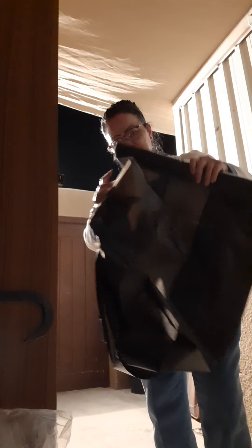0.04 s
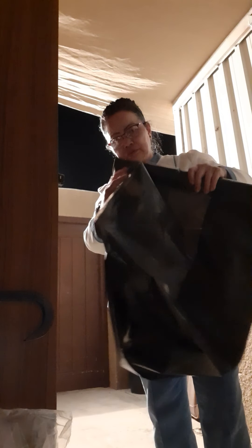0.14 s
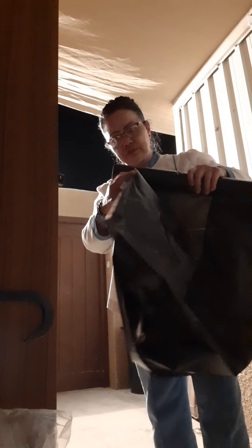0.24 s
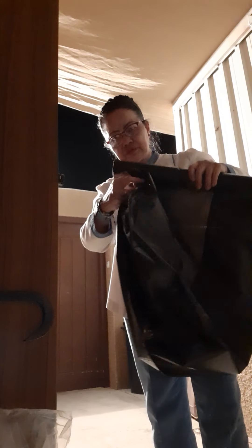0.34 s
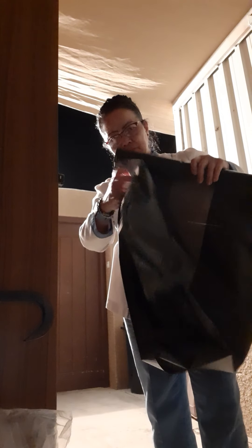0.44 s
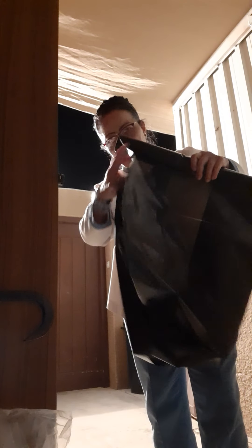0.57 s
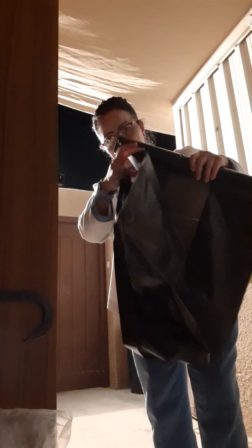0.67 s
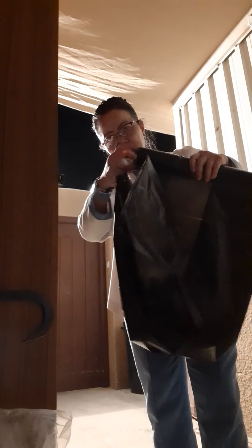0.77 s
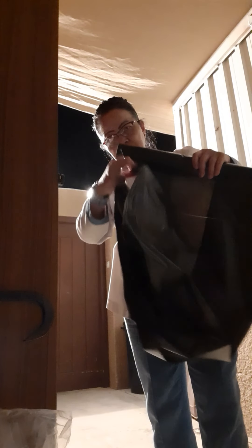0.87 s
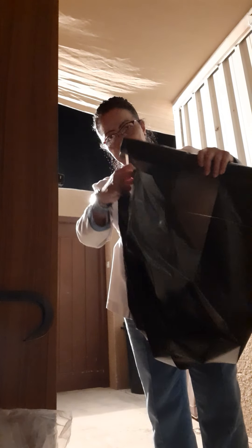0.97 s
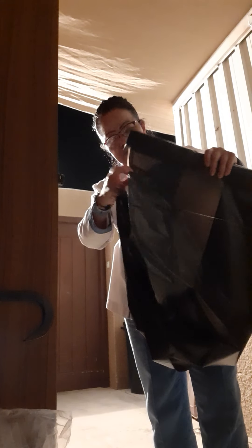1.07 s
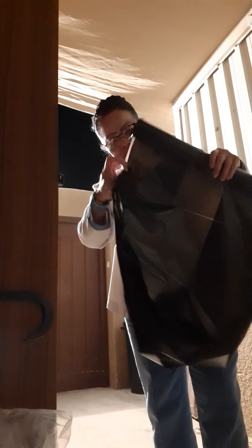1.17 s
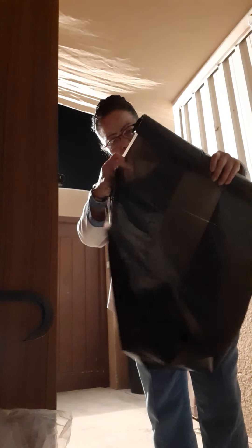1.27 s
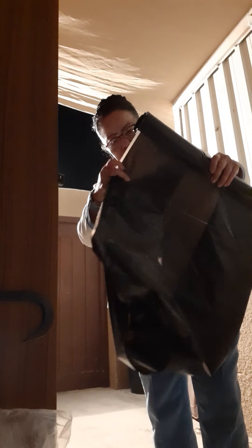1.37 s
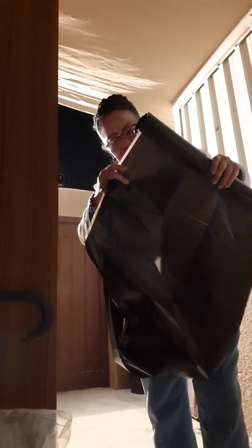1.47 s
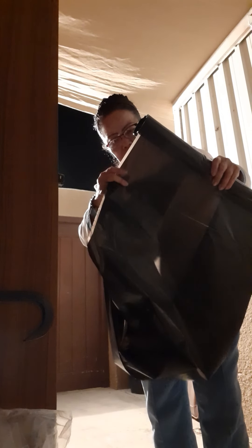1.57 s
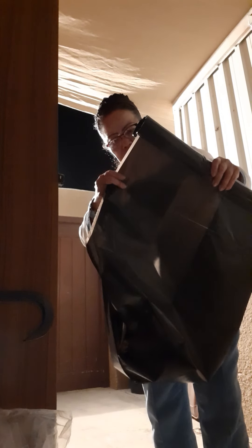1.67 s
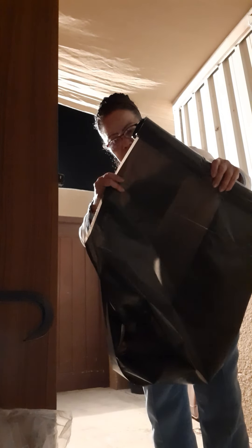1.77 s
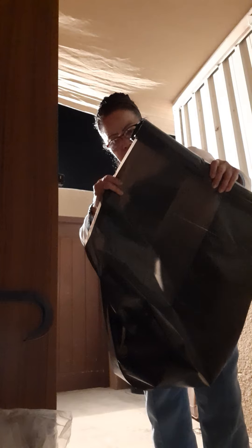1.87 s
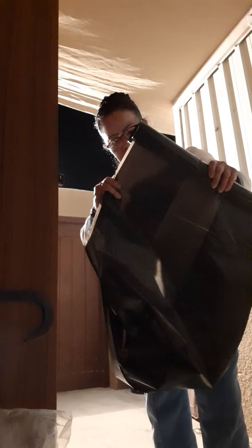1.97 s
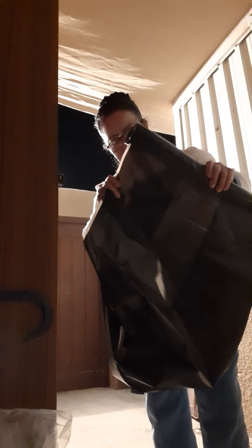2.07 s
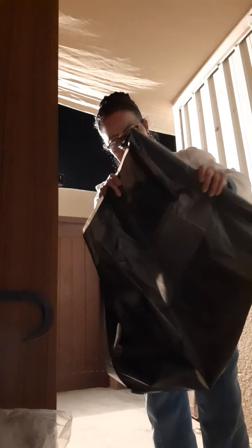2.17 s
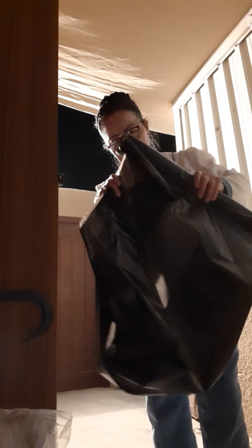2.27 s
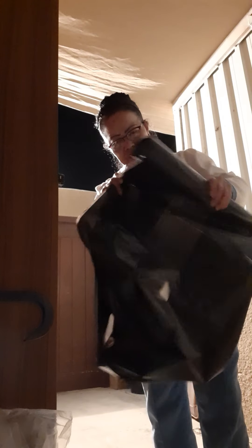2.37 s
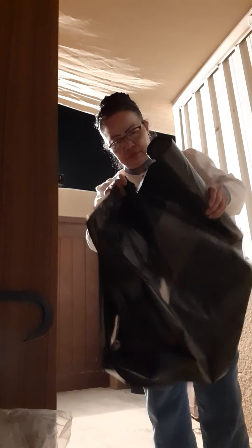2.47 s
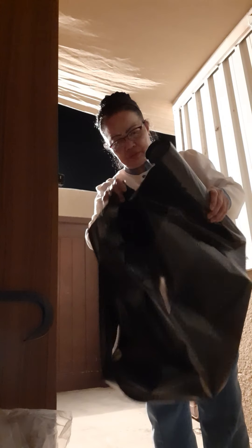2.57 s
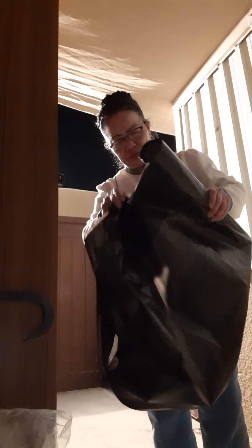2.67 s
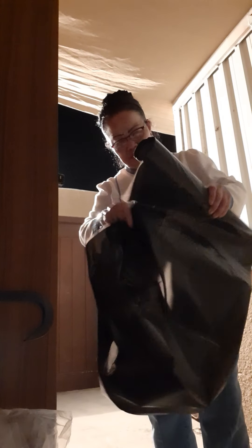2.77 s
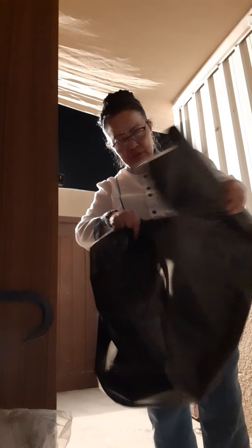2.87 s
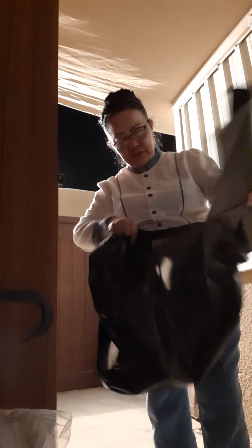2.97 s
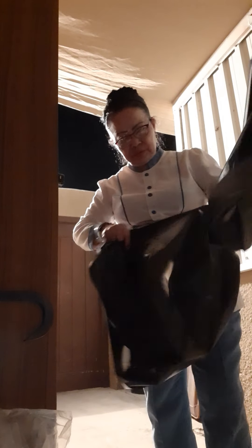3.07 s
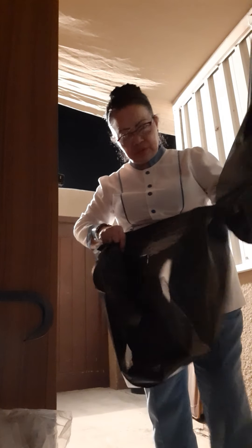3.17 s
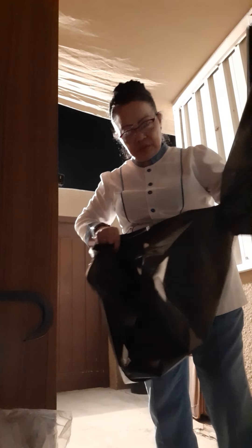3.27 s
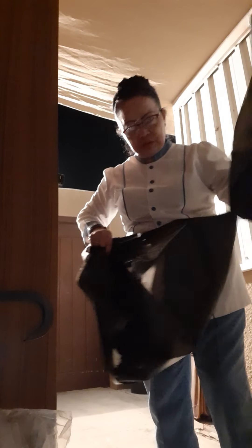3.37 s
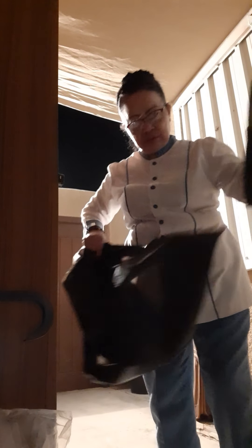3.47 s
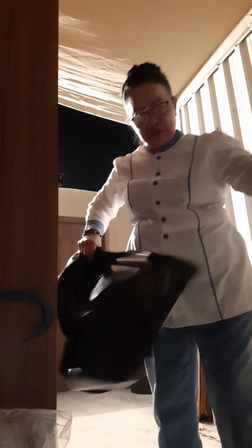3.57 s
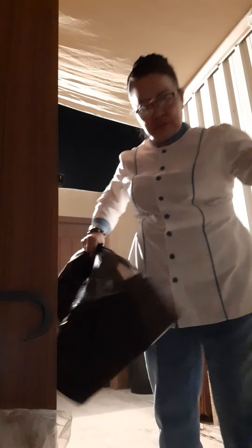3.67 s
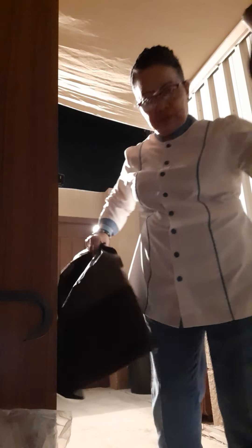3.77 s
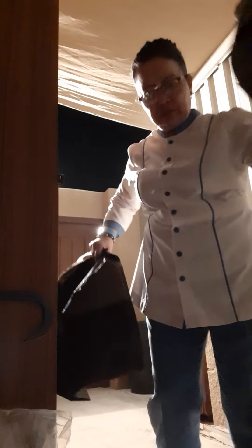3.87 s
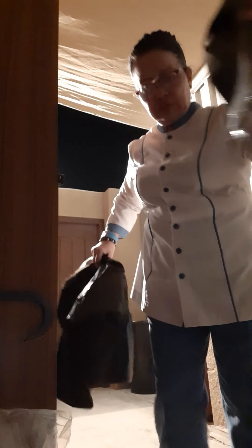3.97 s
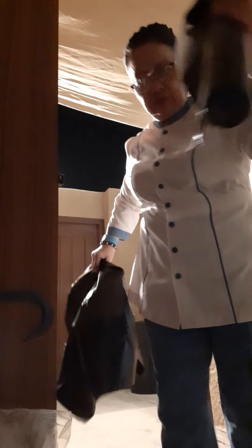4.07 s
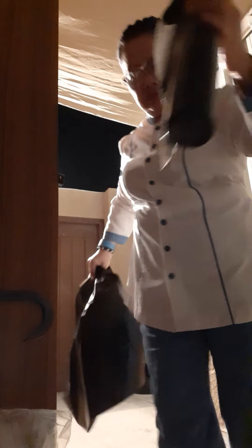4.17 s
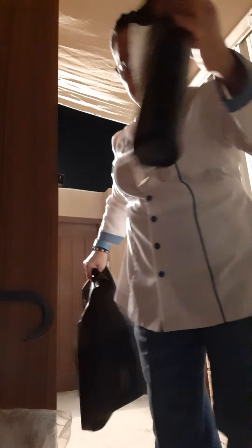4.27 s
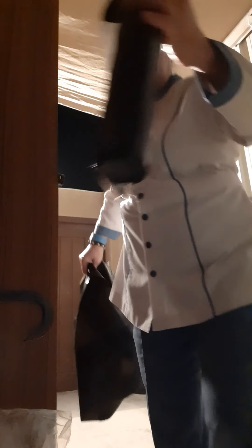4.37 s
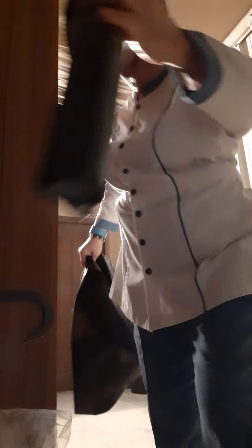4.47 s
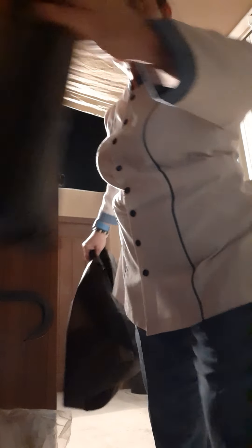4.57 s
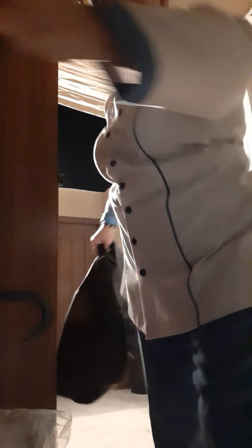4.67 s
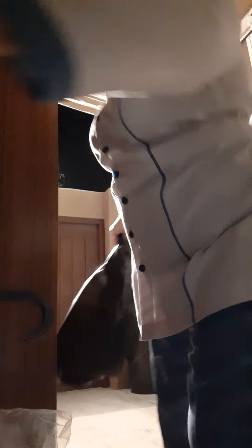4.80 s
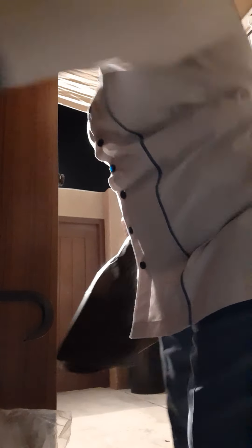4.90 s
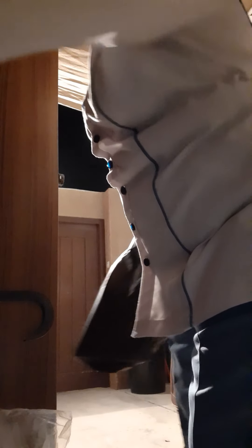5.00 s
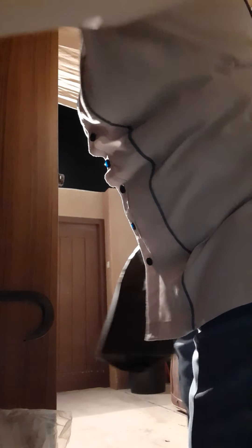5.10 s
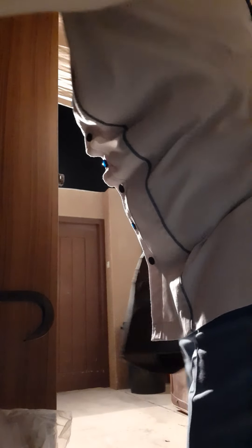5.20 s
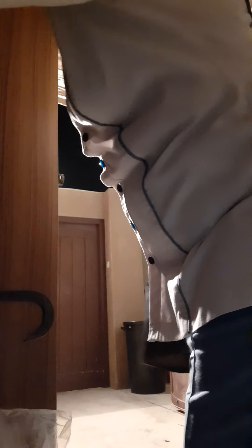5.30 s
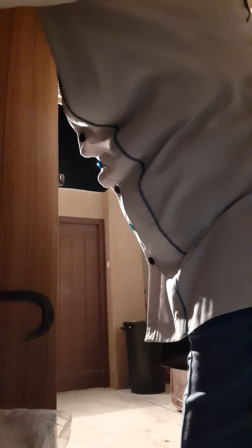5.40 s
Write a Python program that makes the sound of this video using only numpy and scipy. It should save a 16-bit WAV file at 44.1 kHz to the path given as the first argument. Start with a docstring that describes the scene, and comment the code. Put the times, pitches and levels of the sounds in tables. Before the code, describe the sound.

Thin plastic film rustles quietly over low room rumble, bursts into loud crackling tugs and a short rip, then fades to brushing and soft footfalls.

```python
"""Soft crinkling of a big plastic bin bag over a low room rumble, in a small hard-walled room.
The film, built from thousands of tiny creases, billows under hard tugs and rips along its perforation.
After one more tug the roll, then the sleeve, brush past close on the right as fine stick-slip grains.
Large creases snap as single ticks; two soft footfalls are short ringing knocks. Echoes join them all."""
import sys
import numpy as np
from scipy import signal
from scipy.fft import rfft, irfft
from scipy.io import wavfile
from scipy.ndimage import uniform_filter1d

SR = 44100
rng = np.random.default_rng(int(sys.argv[2]) if len(sys.argv) > 2 else 0)


def store_wav(level_fs):
    """Save 16-bit WAV to argv[1]."""
    pcm = np.round(np.clip(np.atleast_2d(level_fs), -1, 1) * 32767)
    wavfile.write(sys.argv[1], SR, pcm.T.astype(np.int16))


N = 239977
TIME = np.arange(N) / SR


def from_db(db):
    """Decibels to gain."""
    return 10 ** (np.asarray(db) / 20)


def rms_one(x):
    """Scale to rms 1."""
    return x / np.sqrt(np.mean(x ** 2) + 1e-20)


def at_hz(points, hz):
    """Read a spectrum on a log-frequency axis."""
    f, value = np.transpose(points)
    return np.interp(np.log(hz + 1), np.log(f), value)


def band(x, low_hz, high_hz, order=2):
    """Butterworth band-pass: keep what lies between two frequencies."""
    edges_hz = [low_hz, min(high_hz, .48 * SR)]
    return signal.sosfilt(signal.butter(order, edges_hz, "band", fs=SR, output="sos"), x + 1e-18)


def convolve(x, response):
    """Pass through an impulse response, channel by channel."""
    return signal.oaconvolve(np.atleast_2d(x), np.atleast_2d(response), axes=1)[:, :N]


def colour(x, spectrum, size=8192):
    """Causal (minimum-phase) filter with the given spectrum."""
    spectrum_db = at_hz(spectrum, np.fft.rfftfreq(size, 1 / SR))
    cepstrum = irfft(np.log(from_db(spectrum_db)))
    # folding the cepstrum forward in time makes the filter causal
    cepstrum[1:size // 2] *= 2
    cepstrum[size // 2 + 1:] = 0
    return convolve(x, irfft(np.exp(rfft(cepstrum))))


def resonate(x, hz, width_hz):
    """Two-pole resonance, gain 1 on top."""
    return signal.lfilter(*signal.iirpeak(hz, hz / width_hz, fs=SR), x + 1e-18)


def evened(x, window_s):
    """Hold the running level at 1; single grains keep standing out."""
    window = int(window_s * SR)
    power = uniform_filter1d(np.mean(x ** 2, axis=0), window)
    return x / np.sqrt(np.abs(uniform_filter1d(power, window)) + 1e-20)


def stroke(s, attack_s, hold_s, release_s, level_db, *above_db):
    """Power of one movement: it swells up to time s, holds and dies away; further rows are its layers."""
    before = np.maximum(s - TIME, 0) / attack_s
    after = np.maximum(TIME - s - hold_s, 0) / release_s
    gains = from_db(level_db + np.array([0, *above_db]))
    return (gains[:, None] * np.exp(-np.minimum(before + after, 20))) ** 2


def levels(strokes):
    """Overlapping movements add up: the level in dB, then each further layer in dB above it."""
    level_db, *others = 10 * np.log10(sum(strokes))
    return [level_db] + [db - level_db for db in others]


# Noise of the room. Each row: frequency in Hz, relative level in dB.
RUMBLE_SPECTRUM = [(15, -6), (25, -29.5), (46, 1), (70, -4.5), (100, -6), (125, -12.5), (190, -16),
                   (236, -18), (384, -21), (677, -27.5), (988, -25.5), (1330, -31.5), (1520, -26.5),
                   (1890, -40.5), (2480, -42.5), (2690, -43.5), (16000, -54)]
# How alike left and right are in the rumble. Each row: frequency in Hz, likeness from 0 to 1.
RUMBLE_LIKENESS = [(40, 0.99), (150, 0.91), (500, 0.71), (1200, 0.15), (4000, 0)]
RUMBLE_DB = -46   # rms, ahead of the microphone


def rumble():
    """Steady low room noise: a shared and an opposite part make it alike on both sides in the bass."""
    shared_db = [(hz, 10 * np.log10(1 + np.clip(c, 0, .995))) for hz, c in RUMBLE_LIKENESS]
    opposite_db = [(hz, 10 * np.log10(1 - np.clip(c, 0, .995))) for hz, c in RUMBLE_LIKENESS]
    mid, side = rng.standard_normal((2, N))
    stereo = colour(mid, shared_db) + colour(side, opposite_db) * [[1], [-1]]
    return from_db(RUMBLE_DB) * rms_one(band(colour(stereo, RUMBLE_SPECTRUM), 33.56, 22000, order=6))


# Narrow resonances of the room. Each row: frequency in Hz, width in Hz, level in dB (2 dB is taken off below).
ROOM_RESONANCES = [(222.4, 19, -8), (422.9, 15.2, -9), (571.8, 14, -6), (701.8, 16.5, -7.5),
                   (1029, 14, -6.5), (1528, 90, -3.5), (1734, 35, -4.5), (2051, 60.8, -0.5)]


def room_resonances(x):
    """Add the pitches at which the room itself rings along."""
    ringing = sum(from_db(db) * resonate(x, hz, width) for hz, width, db in ROOM_RESONANCES)
    return x + from_db(-2.0) * ringing


def room(x, wet_db, t60_low, t60_high):
    """Diffuse tail off the walls, dying sooner in the treble; t60 is the seconds taken to fade 60 dB."""
    t = TIME[:SR // 2]
    edges = np.geomspace(120, 17000, 8)
    t60s = np.geomspace(t60_low, t60_high, len(edges) - 1)
    tail = np.zeros((2, len(t)))
    for low_hz, high_hz, t60 in zip(edges, edges[1:], t60s):
        tail += band(rng.standard_normal((2, len(t))), low_hz, high_hz) * from_db(-60 * t / t60)
    tail = tail * (t > .006)   # the echoes start after 6 ms
    return x + from_db(wet_db) * convolve(x, tail / np.linalg.norm(tail[0]))


def narrow_lows(x, corner_hz):
    """Long waves reach both microphones alike, so the left-right difference loses its bass."""
    mid, side = (x[0] + x[1]) / 2, (x[0] - x[1]) / 2
    side = signal.sosfilt(signal.butter(1, corner_hz, "high", fs=SR, output="sos"), side)
    return np.array([mid + side, mid - side])


# The footfalls. Each row: start in seconds, level in dB, contact time in seconds (longer lands softer).
FOOTFALLS = [(4.681, -26.5, 0.0012), (5.3978, -29.5, 0.000294)]
# What a footfall rings with. Each row: frequency in Hz, level in dB, time to fade 60 dB in seconds.
FLOOR_RINGS = [(131.5, -8, 0.069), (249, -7, 0.0298), (369, 1.5, 0.0117), (595, -3, 0.0112),
               (926, -11.5, 0.0085), (1520, -10.5, 0.007)]


def footfalls():
    """A heel lands with a short dull knock: a few low tones that die away fast."""
    out = np.zeros(N)
    for s, level_db, contact_s in FOOTFALLS:
        t = np.maximum(TIME - s, 0)
        knock = sum(from_db(db - 60 * t / t60) * np.sin(2 * np.pi * hz * t) for hz, db, t60 in FLOOR_RINGS)
        out += from_db(level_db) * knock * (1 - np.exp(-t / contact_s))
    return out


def air_push(low_hz, high_hz):
    """Dull puffs of air shoved about by a moving surface; rms 1."""
    return rms_one(band(rng.standard_normal(N), low_hz, high_hz))


def crease(hz, lag, scatter_db, scatter_s, size=1200):
    """One crease in stereo: a sharp tick, a brief ring at `hz`, scatter off the sheet and nearby surfaces."""
    t = np.arange(size) / SR
    fade = np.exp(-t / scatter_s) * (1 - np.exp(-t / 0.000622))
    scatter = rng.standard_normal((2, size)) * fade
    paths = from_db(scatter_db) * scatter / np.linalg.norm(scatter[0])
    # the direct sound reaches one microphone first: a positive lag delays the left, in samples
    paths[[0, 1], [max(round(lag), 0), max(-round(lag), 0)]] += 1
    return paths + 1.244 * np.sqrt(4000 / hz) * resonate(paths, hz, 0.339 * hz)


def crackle(per_s, spread_db, lag, lag_spread, scatter_db, count=96):
    """Creases buckle at random, many small and a few large, each with a pitch and a place on the sheet."""
    kinds = []
    for hz in np.geomspace(900, 15000, count):
        kinds.append(crease(hz, lag + lag_spread * rng.normal(), scatter_db, 0.00642))
    sizes = from_db(spread_db * np.minimum(rng.exponential(1, N), 5)) * rng.choice([-1, 1], N)
    kind, length = rng.integers(0, count, N), kinds[0].shape[1]
    out = np.zeros((2, N + length))
    for at in np.flatnonzero(rng.random(N) < per_s / SR):
        out[:, at:at + length] += sizes[at] * kinds[kind[at]]
    return out[:, :N]


def sliding(strokes, spectrum, per_s, spread_db, lag, scatter_db, right_db, air_db):
    """Fine stick-slip grains close by on the right: the left hears them about `lag` samples late."""
    rub_db, sizzle_db = levels(strokes)
    moving = rub_db > -100
    grains = crackle(per_s * moving, spread_db, lag, lag_spread=0.77, scatter_db=scatter_db)
    grains = colour(grains, spectrum)
    rub = evened(band(grains, 276, 6000, order=4), 0.084)
    sizzle = evened(band(grains, 7870, 18700, order=4), 0.088) * from_db(sizzle_db + 2.5)
    air = from_db(air_db) * air_push(65, 203)
    return from_db(rub_db - 1.09) * (rub + sizzle + air) * from_db([[-right_db], [right_db]])


# The sleeve slides by. Each row: when it reaches full level in seconds, hold in seconds,
# rub in dB, sizzle in dB above the rub (`sliding` trims both a little).
SLEEVE_SLIDES = [(4.609, 0.029, -54, -1.5), (4.696, 0.0173, -55.5, 1), (4.769, .06, -55, -6.5),
                 (4.889, 0.0666, -54.5, -2), (5.093, 0.1372, -35.5, -5.5), (5.288, 0.048, -44.5, -2)]
# Tone of the rubbing sleeve. Each row: frequency in Hz, relative level in dB.
SLEEVE_SPECTRUM = [(120, -34), (200, -6), (263, -0.5), (366, -8), (635, -7), (1000, -12), (1420, -11.5),
                   (1680, -8), (1840, -15), (2050, -10), (4200, -3), (6520, -7), (7970, -7.5), (8900, -14),
                   (12800, -16), (16000, -19.5)]
# a longer slide starts and stops more gently: shares of its hold
SLEEVE_ATTACK_SHARE, SLEEVE_RELEASE_SHARE = 0.268, 0.522


def sleeve():
    """Cloth catches and slips in fine grains as it slides past the microphone."""
    slides = []
    for s, hold_s, rub_db, sizzle_db in SLEEVE_SLIDES:
        attack_s, release_s = SLEEVE_ATTACK_SHARE * hold_s, SLEEVE_RELEASE_SHARE * hold_s
        slides.append(stroke(s, attack_s, hold_s, release_s, rub_db, sizzle_db))
    return sliding(slides, SLEEVE_SPECTRUM, per_s=12000, spread_db=5.0, lag=17, scatter_db=3,
                   right_db=1.0, air_db=-16.0)


# The roll swings past the microphone. Each row: when it reaches full level in seconds, hold in seconds,
# rub in dB, sizzle in dB above the rub (`sliding` trims both a little).
ROLL_SWINGS = [(4.058, 0.043, -37.5, -2.5), (4.306, 0.0103, -60, -4.5), (4.353, 0.0263, -56.5, -5.5)]
# Tone of the rubbing roll. Each row: frequency in Hz, relative level in dB.
ROLL_SPECTRUM = [(120, -29), (200, -1), (373, 2), (519, -6.5), (821, -3), (1250, -5.5), (2090, -7),
                 (3070, -7), (4120, -13), (4600, -6), (6640, -6), (7970, 0), (9060, -11), (11500, -9.5),
                 (16000, -11)]
ROLL_ATTACK_S, ROLL_RELEASE_S = 0.00326, 0.0171


def roll():
    """The roll of film rubs in fine stick-slip grains with each quick swing."""
    swings = [stroke(s, ROLL_ATTACK_S, hold_s, ROLL_RELEASE_S, rub_db, sizzle_db)
              for s, hold_s, rub_db, sizzle_db in ROLL_SWINGS]
    return sliding(swings, ROLL_SPECTRUM, per_s=12000, spread_db=3.5, lag=16, scatter_db=-2.5,
                   right_db=1.6, air_db=-9.5)


# Single creases snapping over. Each row: start in seconds, bite in dB (8 dB is taken off below),
# sizzle in dB above the bite.
CREASE_SNAPS = [(0.3082, -42.5, -10), (0.7814, -50.5, -8), (1.0297, -49, -9.5), (1.108, -41, 1),
                (1.129, -46, -3), (1.2388, -51, -10.5), (1.2873, -42.5, -14), (1.7363, -53, -7.5),
                (1.793, -51.5, 5.5), (2.0612, -51, -13), (2.2167, -49.5, 4), (2.2548, -49.5, 5),
                (2.2744, -45.5, -10.5), (2.3054, -48.5, 8), (2.3755, -30.5, 0), (2.4378, -32.5, -8.5),
                (2.4779, -39, -1), (2.5552, -46.5, 4), (2.61, -42, -18.5), (2.7181, -42, -21.5),
                (2.8014, -27, -5), (2.9191, -27.5, -3.5), (3.0744, -28, -17.5), (3.5877, -56, -20),
                (3.6162, -49.5, -7), (3.6395, -44, -4.5), (3.6763, -34.5, -10.5), (3.9775, -54.5, -1),
                (4.0539, -45.5, 3.5), (4.127, -43, 6.5), (4.4108, -50.5, -28.5), (4.8696, -56, 10)]
SNAP_BODY_DB = -5.5   # low knock of a snap, above its bite
SNAP_HZ, SNAP_OCT_PER_DB = 5220, .05   # its ring; the more it sizzles, the higher it rings


def snaps(size=1200):
    """Large creases flip over with a tick: broad ones knock dully, tight ones ring high and sizzle."""
    out = np.zeros((2, N + size))
    for s, bite_db, sizzle_db in CREASE_SNAPS:
        ring_hz = SNAP_HZ * 2 ** (SNAP_OCT_PER_DB * sizzle_db)
        tick = crease(ring_hz, rng.normal(-0.97, 0.69), scatter_db=3.5, scatter_s=0.00306)
        body = band(tick, 712, 1560)
        bite = -band(tick, 1320, np.clip(2 * ring_hz, 3500, 8800))   # flipped against body and sizzle
        sizzle = band(tick, 9140, 17300)
        parts = [(body, SNAP_BODY_DB), (bite, 0), (sizzle, sizzle_db)]
        at = int(s * SR)
        out[:, at:at + size] += from_db(bite_db - 8) * sum(from_db(db) * rms_one(part) for part, db in parts)
    return out[:, :N]


# The hanging bag keeps stirring, almost still in two pauses. Each row: time in seconds, crinkle in dB.
# Here and in the next three tables, `bag` and `billow` trim the levels by a dB or two.
BAG_STIR = [(0, -64), (.06, -58), (.43, -62), (.9, -57.5), (1.4, -59.5), (1.6, -67.5), (1.78, -60),
            (1.87, -73), (1.96, -82.5), (2.08, -56.5), (2.7, -53.5), (3.55, -59), (3.92, -65), (4.4, -62),
            (4.52, -70), (4.7, -60), (5.44, -66.5)]
STIR_SIZZLE_DB, STIR_BILLOW_DB = -8, -5.5   # above its crinkle
# The hands shift their grip and the film flexes. Each row: when it reaches full level in seconds,
# hold in seconds, crinkle in dB, sizzle in dB above the crinkle.
GRIP_FLEXES = [(0.125, 0.027, -62.5, 4), (0.231, 0.057, -56, -6.5), (0.312, .035, -44.5, -7.5),
               (0.453, 0.045, -54, -6), (0.551, 0.025, -54, -6), (0.675, 0.0097, -53, -12),
               (0.749, 0.041, -52, -4.5), (0.923, 0.0845, -51.5, -9.5), (1.13, 0.0061, -48, -7.5),
               (1.223, 0.0357, -50, -9), (1.35, 0.038, -51, -5), (1.712, 0.04, -59.5, -2),
               (2.005, 0.0576, -57, -5), (2.115, 0.153, -52.5, -18.5), (2.326, 0.0224, -40, -9.5),
               (2.508, 0.091, -50.5, -10.5), (2.704, 0.029, -49.5, -6.5), (2.765, .025, -43, -2),
               (3.647, 0.039, -46.5, -6.5), (4.002, 0.0049, -50, -10.5)]
FLEX_ATTACK_S, FLEX_RELEASE_S, FLEX_BILLOW_DB = 0.0198, 0.024, -7   # billow above its crinkle
# Hard pulls on the sheet. Each row: when it reaches full level in seconds, then attack, hold and release
# in seconds, crinkle in dB, sizzle and billow in dB above the crinkle.
HARD_TUGS = [(2.373, 0.00575, 0.01214, .038, -24, -5.5, -1.5),
             (2.822, 0.01408, 0.0537, 0.0193, -28, -6, -0.5),
             (2.898, 0.029, 0.0285, 0.081, -23.5, -8.5, -8.5),
             (3.031, 0.01266, 0.0447, 0.0886, -29.5, -4.5, -12.5),
             (3.727, 0.0181, 0.0137, 0.02595, -35, -4.5, -7.5)]
# The steady draw that ends in the rip: a single row with the same columns as the hard pulls.
LONG_DRAW = (3.14, 0.0537, 0.3023, 0.0012, -35, -1.8, -7)


def handling():
    """All that the hands do to the bag: steady stirring, soft flexes, hard tugs and the long draw."""
    stir_db = np.interp(TIME, *np.transpose(BAG_STIR))
    stir = from_db(stir_db + np.array([[0], [STIR_SIZZLE_DB], [STIR_BILLOW_DB]])) ** 2
    flexes = [stroke(s, FLEX_ATTACK_S, hold_s, FLEX_RELEASE_S, db, sizzle_db, FLEX_BILLOW_DB)
              for s, hold_s, db, sizzle_db in GRIP_FLEXES]
    tugs = [stroke(*tug) for tug in HARD_TUGS]
    return levels([stir, *flexes, *tugs, stroke(*LONG_DRAW)])


RIP_START_S, RIP_END_S, TEETH_PER_S = 3.28, 3.45, 85


def perforation(depth):
    """The bridges of the perforation give way one after another and pulse the crackle."""
    rate = TEETH_PER_S * (1 + 0.095 * rms_one(band(rng.standard_normal(N), 10, 30)))   # slightly uneven
    since_tooth = np.cumsum(rate) / SR % 1   # 0 as a bridge breaks, 1 at the next
    ripping = (TIME > RIP_START_S) & (TIME < RIP_END_S)
    return np.where(ripping, rms_one(np.exp(-depth * since_tooth)), 1)


# a firm pull, its rate of creases, and how far the rate follows the level
FIRM_DB, FIRM_CREASES_PER_S, RATE_FOLLOWS = -31.5, 3600, .2
TENSION_OCT_PER_DB = 0.05   # the sheet rings higher as it is pulled harder
# The sheet and the air it holds, under a firm pull.
# Each row: frequency in Hz, width in Hz, relative level in dB.
BILLOW_RINGS = [(284.4, 69, 2), (373, 71.6, 6), (510.5, 81, -10.5), (629, 68, -2.5), (864, 120, -8.5)]


def billow(crinkle_db, billow_db):
    """Broad folds flop dully while the sheet is slack; big ones set it ringing, tuned by its tension."""
    folds = crackle(FIRM_CREASES_PER_S, spread_db=5.5, lag=0, lag_spread=6.47, scatter_db=-0.5)
    struck = band(folds, 208.4, 963)
    ringing = rms_one(sum(from_db(db) * resonate(struck, hz, width) for hz, width, db in BILLOW_RINGS))
    # reading the ringing faster or slower bends its pitch
    pitch = 2 ** (TENSION_OCT_PER_DB * np.clip(crinkle_db - FIRM_DB, -6, 7))
    read_at = np.cumsum(pitch) % N
    ringing = np.array([np.interp(read_at, np.arange(N), side) for side in ringing])
    flap = np.clip((crinkle_db + billow_db + 42.5) / 10, .1, 1)   # share of ringing against dull flops
    flops = rms_one(band(folds, 229, 969))
    return evened(flap * ringing + (1 - flap) * flops, 0.0164) * from_db(billow_db + 1.0)


# Tone of the slack film. Each row: frequency in Hz, relative level in dB.
SLACK_SPECTRUM = [(350, -32.5), (600, -8), (1050, -11), (1160, -7.5), (1510, -4), (1930, -10.5), (2240, -5),
                  (2470, -6.5), (7620, -6.5), (8860, -10.5), (11700, -11.5), (15500, -11), (16000, -24.5)]
# Tone of the film pulled taut. Each row: frequency in Hz, relative level in dB.
TAUT_SPECTRUM = [(350, -23), (600, -3), (950, -11), (1290, -7), (1500, -8), (2090, -6.5), (2610, -11.5),
                 (3990, -10.5), (7310, -13), (8740, -16.5), (12500, -17), (16000, -17)]
SOFT_SPREAD_DB, FIRM_SPREAD_DB = 5.5, 4   # spread of crease sizes
# creases buckle in quick clusters: swing and range of rates
CLUSTER_DB, CLUSTER_LOW_HZ, CLUSTER_HIGH_HZ = 0.97, 12.7, 60


def bag():
    """Harder handling buckles more creases a second; a tug pulls the film taut, so that it cracks darker."""
    crinkle_db, sizzle_db, billow_db = handling()
    per_s = FIRM_CREASES_PER_S * from_db(RATE_FOLLOWS * (crinkle_db - FIRM_DB))
    taut = np.clip((crinkle_db - FIRM_DB) / 9, 0, 1)
    spread_db = np.interp(crinkle_db, [-58, FIRM_DB], [SOFT_SPREAD_DB, FIRM_SPREAD_DB])
    creases = crackle(per_s, spread_db, lag=-2, lag_spread=2.8, scatter_db=0.0)
    slack_film = rms_one(colour(creases, SLACK_SPECTRUM))
    taut_film = rms_one(colour(creases, TAUT_SPECTRUM))
    film = (1 - taut) * slack_film + taut * taut_film
    crinkle = evened(band(film, 769, 6204, order=4), 0.0215)
    sizzle = evened(band(film, 7413, 17600, order=4), 0.0206) * from_db(sizzle_db + 2.0)
    swing = rms_one(band(rng.standard_normal(N), CLUSTER_LOW_HZ, CLUSTER_HIGH_HZ))
    clusters = from_db(CLUSTER_DB * swing)
    crackling = (crinkle + sizzle) * clusters * perforation(depth=0.78)
    air = from_db(np.minimum(crinkle_db, -35) - 11.5) * air_push(52.6, 145.3)   # the moving sheet fans the air
    return from_db(crinkle_db - 1.15) * (crackling + billow(crinkle_db, billow_db)) + air


def scene():
    """Bag, roll, sleeve and feet sound in the room, over its rumble."""
    sources = bag() + snaps() + roll() + sleeve() + footfalls()
    in_room = room(room_resonances(sources), wet_db=-10.5, t60_low=0.315, t60_high=0.093)
    return narrow_lows(in_room, corner_hz=863) + rumble()


# Colour of the microphone ports. Each row: frequency in Hz, width in Hz, boost or cut in dB.
PORT_COLOUR = [(1284, 397, -4), (8978, 2305, -7), (12200, 1790, 3)]
CUTOFF_HZ = 16000


def record(dry):
    """The microphone ports colour the sound and the top is cut."""
    for hz, width, db in PORT_COLOUR:
        dry = dry + (from_db(db) - 1) * resonate(dry, hz, width)
    return signal.sosfilt(signal.ellip(12, .1, 80, CUTOFF_HZ, fs=SR, output="sos"), dry)


dry = scene()
out = record(dry)
store_wav(out)
```